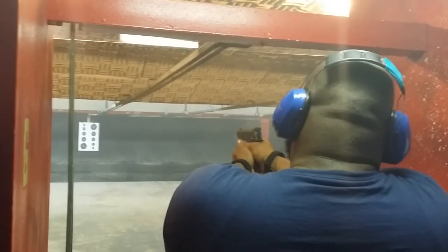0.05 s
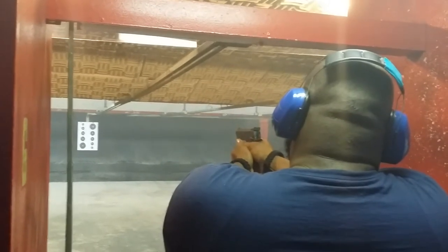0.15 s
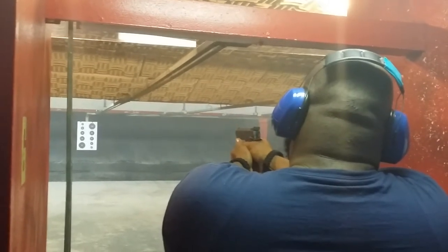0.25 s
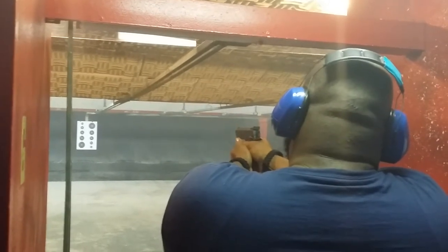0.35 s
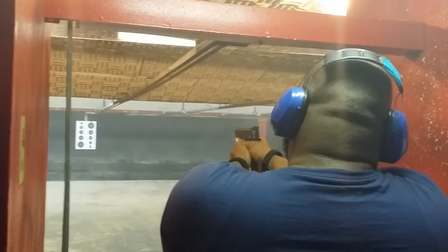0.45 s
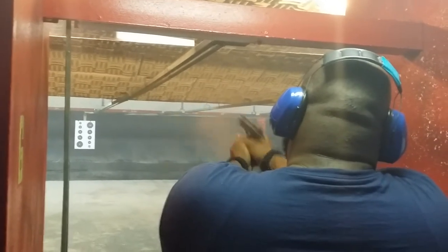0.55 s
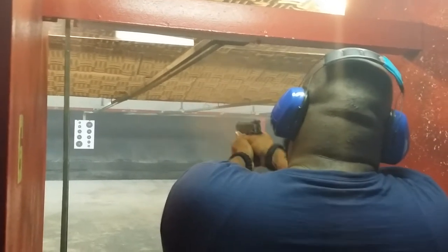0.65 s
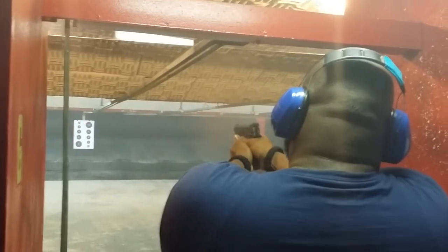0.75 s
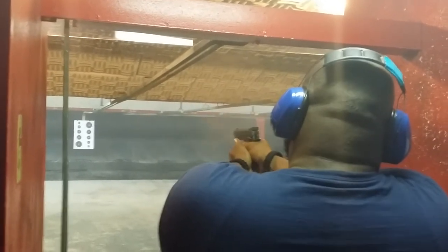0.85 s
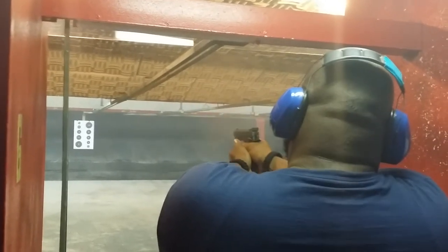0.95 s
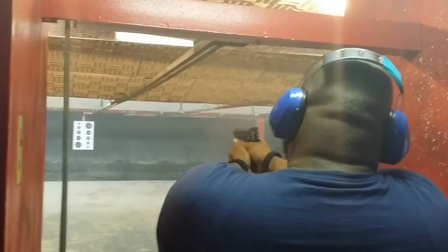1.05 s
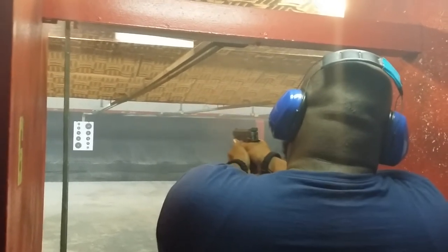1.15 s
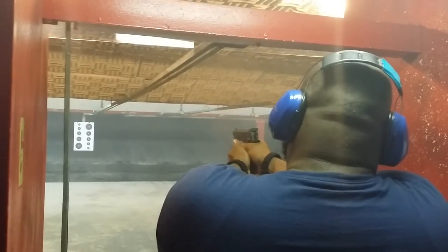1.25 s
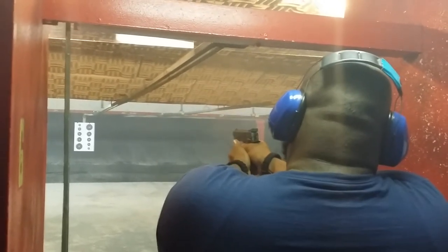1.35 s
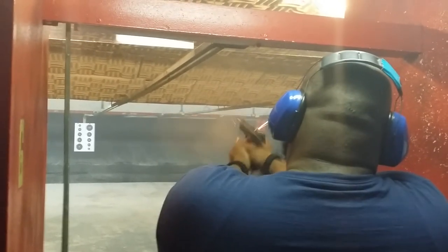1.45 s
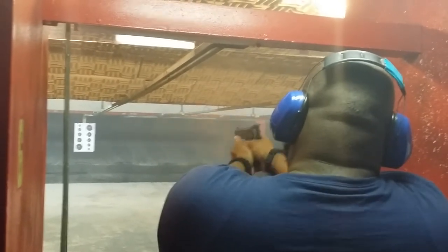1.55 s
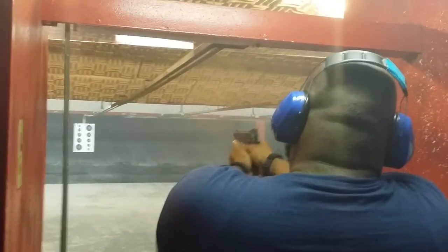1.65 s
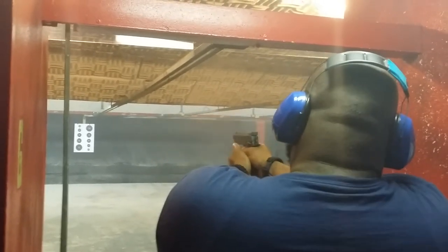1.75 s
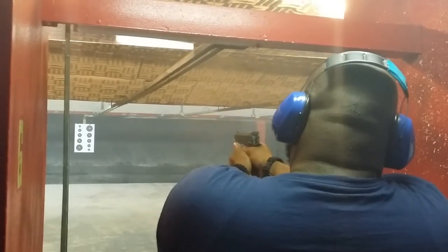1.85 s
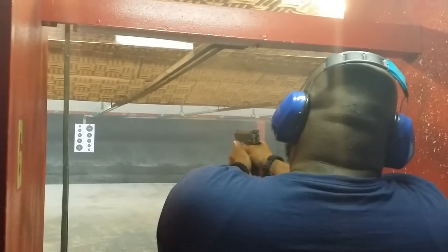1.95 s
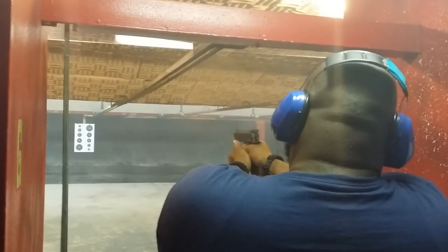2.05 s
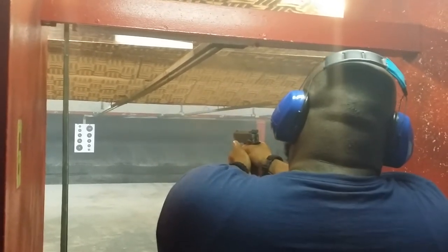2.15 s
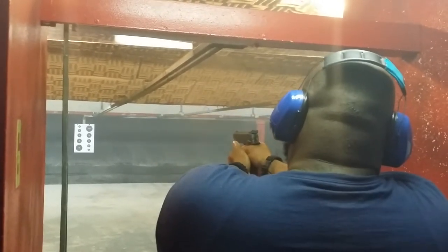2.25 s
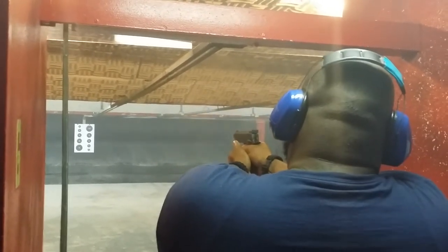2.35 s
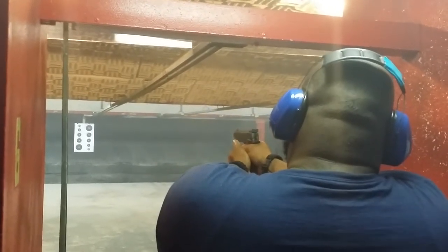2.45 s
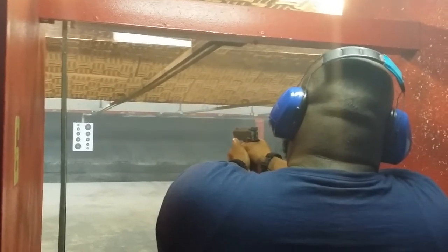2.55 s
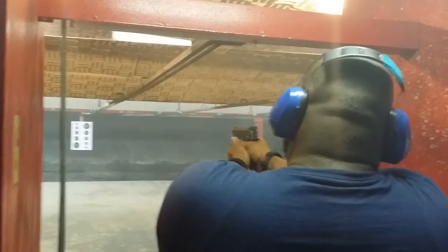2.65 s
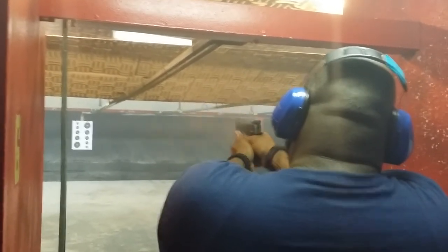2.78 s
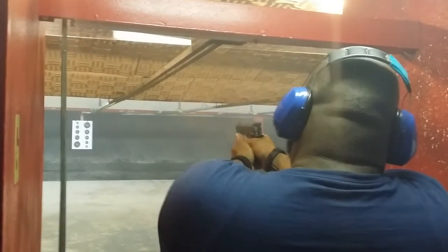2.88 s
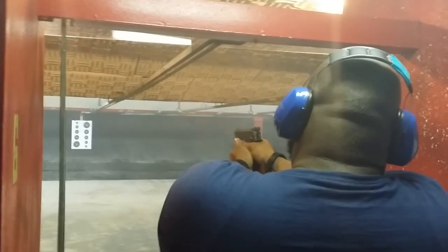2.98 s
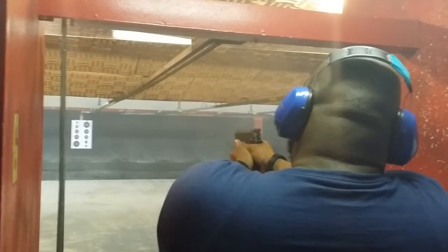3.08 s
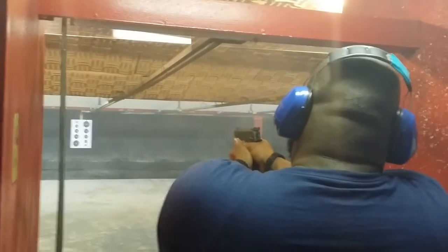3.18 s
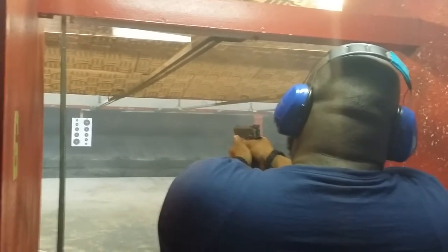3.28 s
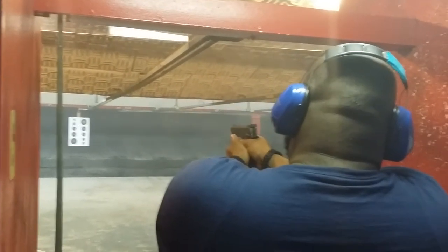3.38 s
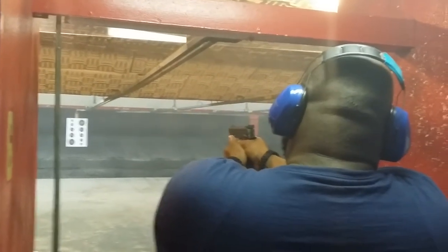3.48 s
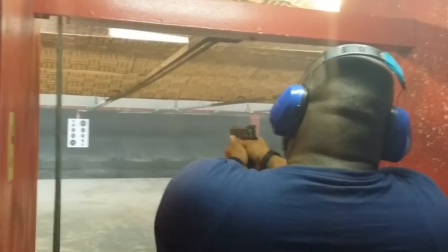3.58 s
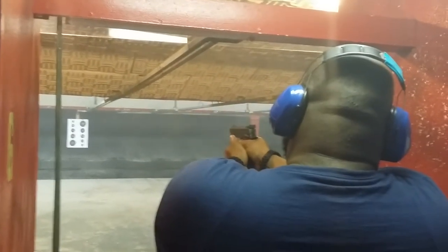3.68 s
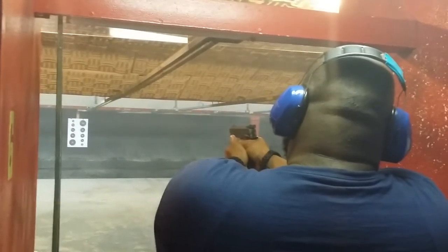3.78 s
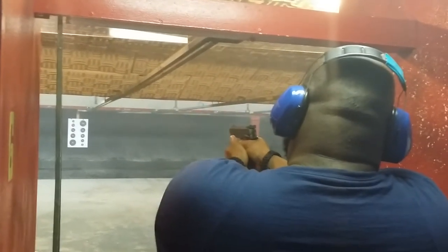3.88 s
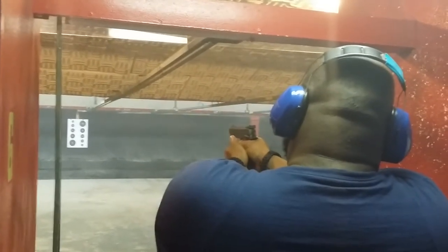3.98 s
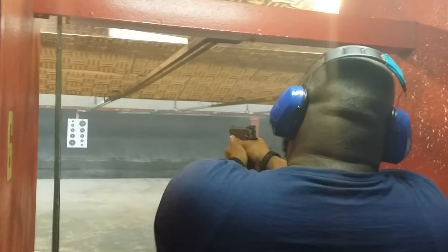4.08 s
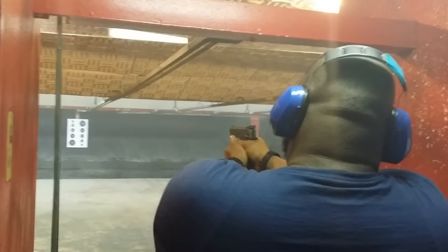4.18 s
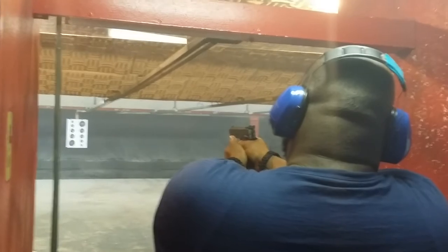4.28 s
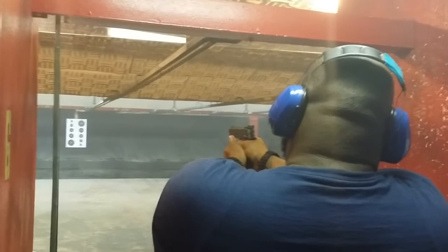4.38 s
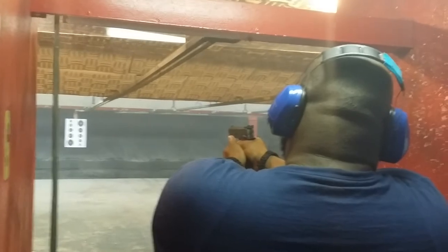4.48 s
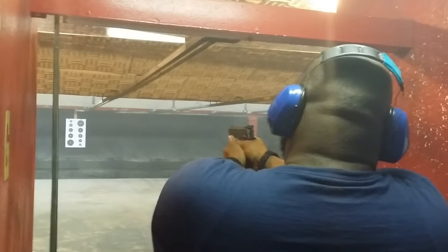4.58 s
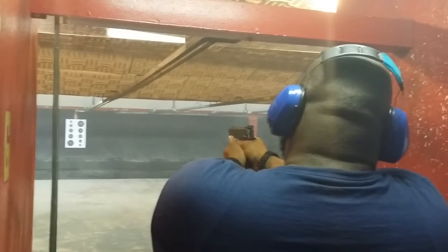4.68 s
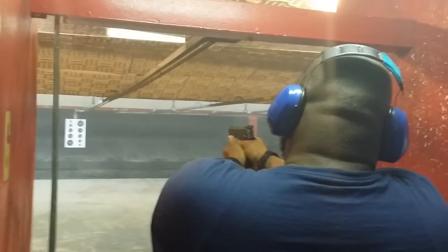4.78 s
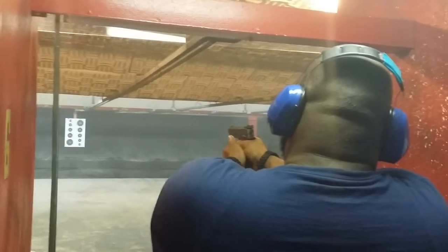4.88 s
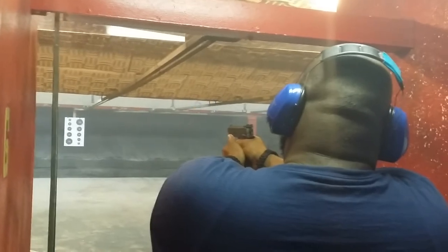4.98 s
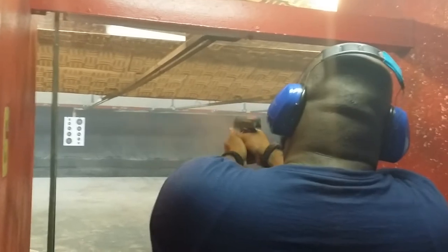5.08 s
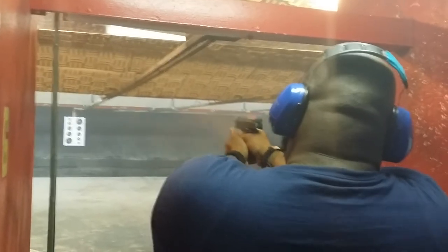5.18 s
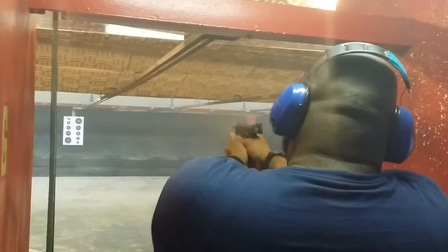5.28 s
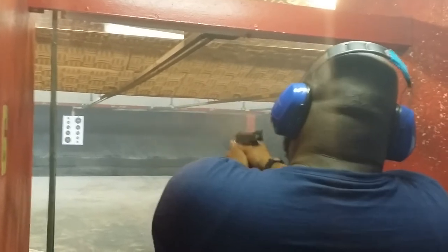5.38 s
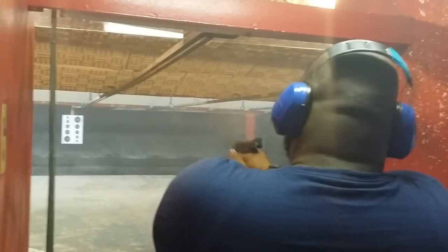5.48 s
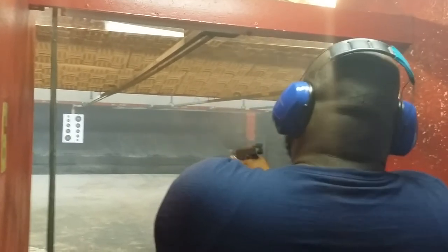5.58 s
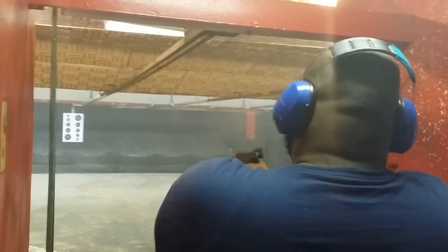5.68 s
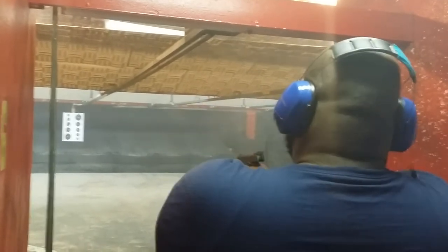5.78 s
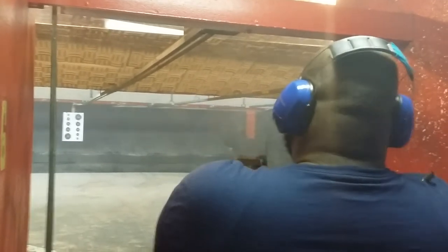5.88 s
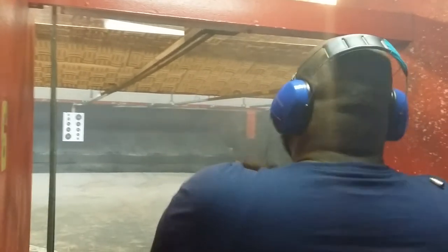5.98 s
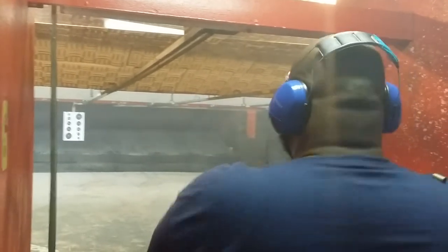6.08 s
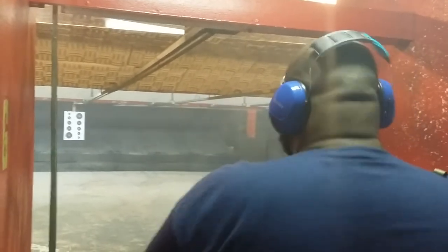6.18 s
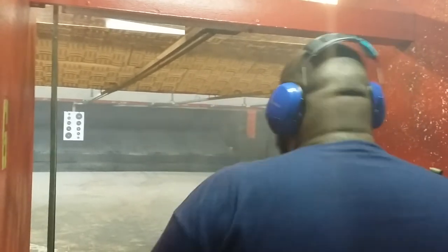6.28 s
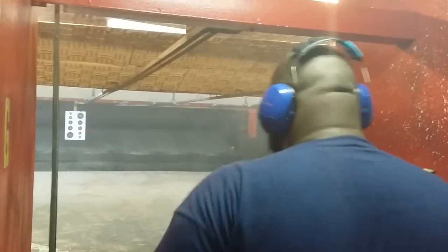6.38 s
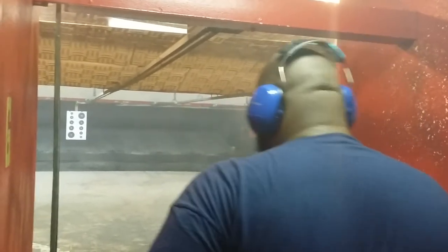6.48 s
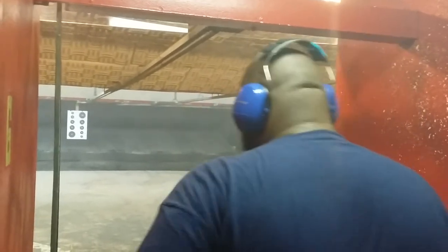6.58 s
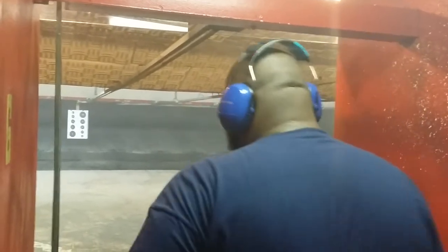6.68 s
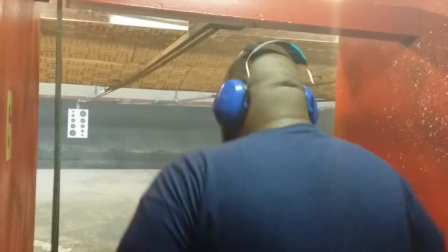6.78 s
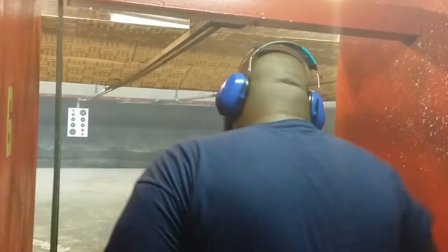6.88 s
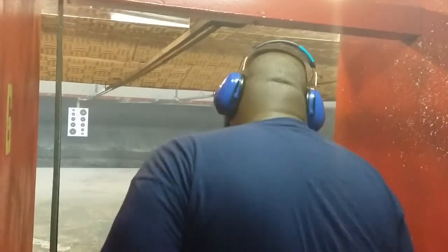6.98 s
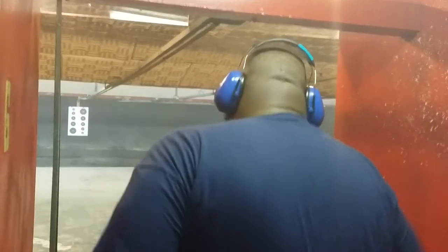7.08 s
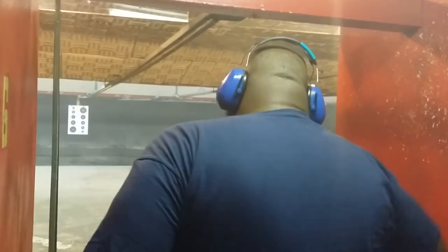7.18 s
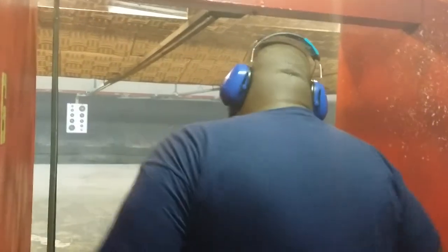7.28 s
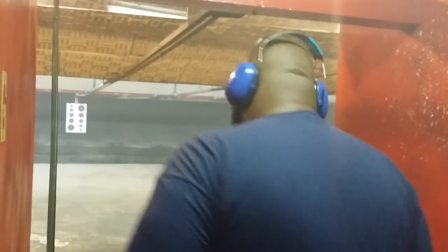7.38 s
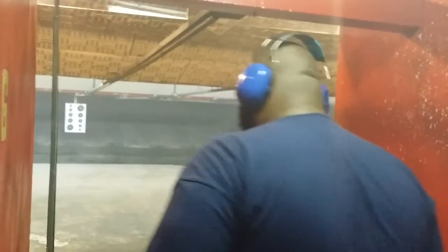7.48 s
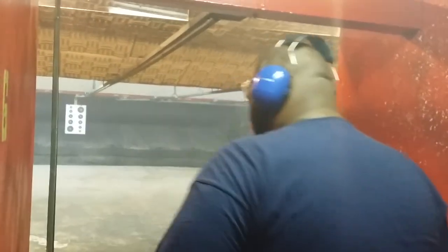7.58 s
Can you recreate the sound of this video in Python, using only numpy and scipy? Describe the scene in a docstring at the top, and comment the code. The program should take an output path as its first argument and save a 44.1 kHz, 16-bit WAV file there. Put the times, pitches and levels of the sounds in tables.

```python
"""An echo dies away over ventilation rumble while a brass case rings and bounces; then four pistol shots.
We stand in a stall of an indoor range, close behind two microphones' worth of overload: each crack is
shaped noise that fills the stall, and the long concrete lane booms back as slower, darker noise.
Spent cases are noise bursts on partitions, bench and floor, with paired sines for the ringing brass.
Late on, cloth rustles as filtered noise while the shooter lowers the gun."""
import sys
import numpy as np
from scipy import signal
from scipy.fft import rfft, irfft, next_fast_len
from scipy.io import wavfile
from scipy.ndimage import uniform_filter1d, map_coordinates

SR = 44100
rng = np.random.default_rng(int(sys.argv[2]) if len(sys.argv) > 2 else 0)


def unload_wav(signal):
    """Save mono or channel-first audio to the path in sys.argv[1] as 16-bit WAV at rate SR, clipped to [-1, 1]."""
    wavfile.write(
        sys.argv[1],
        SR,
        np.round(np.clip(np.atleast_2d(signal).T, -1, 1) * 32767).astype(np.int16),
    )


N = 336924

# In every spectrum below, density_db is the relative level per Hz.
# the shots: start_s, strength_db, pitch_hz of the case thrown out
SHOTS = [(0.471, -1, 7480), (1.384, -0.5, 7390), (2.6621, -0.5, 7490), (4.9713, -1, 7472)]
# cases striking a partition, plus one faint bright tick at 0.95 s: start_s, level_db of the blow, treble_db,
# ring_db of the case
PARTITION_HITS = [(0.9528, -36, 11, -62), (1.3408, -14.5, -9, -40.5), (1.9445, -24.5, 7, -63),
                  (2.197, -27.5, -2, -42.5), (3.2724, -32, -1.5, -66), (3.6127, -20.5, 1.5, -32.5),
                  (7.1146, -15, -7.5, -31.5), (7.2463, -29, 1, -64)]
# the rumble is nearly the same at both microphones in the deep bass: freq_hz, likeness (1 = identical)
RUMBLE_LIKENESS = [(60, 1), (240, 0.54), (950, -0.0013), (3770, -0.04), (15000, -0.07)]


def amp(db):
    """Decibels to gain."""
    return 10 ** (np.asarray(db) / 20)


def unit(x):
    """Scale to rms 1."""
    return x / np.sqrt(np.mean(x ** 2) + 1e-20)


def along(points, hz):
    """(Hz, value) points read on a log frequency axis."""
    f, v = np.transpose(points)
    return np.interp(np.log(hz + 1), np.log(f + 1), v)


def clock(count):
    """Seconds for count samples."""
    return np.arange(count) / SR


def wobble(rate):
    """A smooth random curve, rate knots a second."""
    knots = rng.standard_normal(int(N * rate / SR) + 4)
    return map_coordinates(knots, [clock(N) * rate])


def sides(right_db):
    """Left and right gains for a source that leans right by right_db."""
    return amp(np.array([[-right_db], [right_db]]) / 2)


def add(track, s, sound):
    """Mix a stereo sound in at time s, cut off at the end of the track."""
    part = track[:, round(s * SR):][:, :sound.shape[1]]
    part += sound[:, :part.shape[1]]


def noise(spectrum, count, lifts=(), alike=None):
    """Diffuse stereo noise of rms 1 with a spectrum, resonant lifts and a left-right likeness."""
    # usual likeness of the two microphones: freq_hz, likeness (1 = identical, -1 = opposed)
    usual_likeness = [(60, -0.66), (130, 0.81), (290, 0.2), (640, 0.73), (1200, -0.33), (3000, 0.13),
                      (10000, 0.05)]
    # the side wall favours the right microphone at most frequencies: freq_hz, right_minus_left_db
    wall_lean = [(100, 2.5), (300, -1), (600, 4), (1100, 3.5), (2200, 6), (4200, -1), (7500, 2),
                 (13000, 4.5)]
    hz = np.fft.rfftfreq(count, 1 / SR)
    db = along(spectrum, hz)
    for centre, width, lift in lifts:
        db = db + lift / (1 + (2 * (hz - centre) / width) ** 2)
    likeness = along(usual_likeness if alike is None else alike, hz)
    # the angle between mid and side sets how alike the channels are
    turn = np.arccos(np.clip(likeness, -1, 1)) / 2
    mid, side = rfft(rng.standard_normal((2, count))) * amp(db) * [np.cos(turn), np.sin(turn)]
    lean = amp(along(wall_lean, hz) / 2)
    return unit(irfft([(mid + side) / lean, (mid - side) * lean], count))


def dying(x, t60s, hold=0):
    """After hold seconds each frequency dies at its own speed."""
    hz, t, z = signal.stft(x, SR, nperseg=256)
    fall = amp(-60 * np.maximum(t - hold, 0) / along(t60s, hz)[:, None])
    return signal.istft(z * fall, SR, nperseg=256)[1][:, :x.shape[1]]


def ventilation(vent_db=-51):
    """Low air noise, slowly uneven in level, nearly alike at both microphones in the deep bass."""
    # ventilation rumble: freq_hz, density_db
    rumble = [(20, -25.5), (45, -11), (90, -4), (120, -1), (155, -10.5), (188, 1.5), (215, -8.5),
              (245, -0.5), (310, -17.5), (400, -24), (600, -29.5), (1000, -34.5), (2000, -45),
              (4000, -92.5)]
    return amp(vent_db + wobble(1.7)) * noise(rumble, N, alike=RUMBLE_LIKENESS)


def fan_tone(hz, db, flutter_db=2, drift_rad=.7):
    """A sine of rms level db that wavers in the room, its phase drifting apart at the two microphones."""
    level = amp(db + flutter_db * wobble(2.9))
    phase = drift_rad * np.array([wobble(4.8), wobble(2.3)])
    return level * np.sqrt(2) * np.sin(2 * np.pi * hz * clock(N) + phase)


def fan_hum(trim_db=-1):
    """Steady rotation gives a few fixed fan tones."""
    # fan tones: pitch_hz, level_db before the trim
    tones = [(118.4, -69), (188.4, -63), (242.2, -69.5), (915.2, -85.5)]
    return sum(fan_tone(hz, db + trim_db) for hz, db in tones)


def hiss(hiss_db=-65, dip_db=-11, dip_time=1.3, recovery=.1):
    """Steady noise that sinks at each shot and comes back about dip_time seconds later."""
    # the hiss: freq_hz, density_db
    hiss_colour = [(500, -25), (900, -7.5), (2000, -8.5), (3500, -4.5), (6700, -1.5), (9000, -6),
                   (14500, -11)]
    t = clock(N)
    dips = [(t > s) * (1 - np.tanh((t - s - dip_time) / recovery)) / 2 for s, *_ in SHOTS]
    return amp(hiss_db + dip_db * np.max(dips, axis=0)) * noise(hiss_colour, N)


def opening_echo(wash_db=-39, t60=1.1):
    """A wash of echo, already dying at the start, with two resonances."""
    # the wash: freq_hz, density_db
    wash_colour = [(200, -29.5), (400, -12), (950, -12.5), (1500, 0), (2300, -8.5), (3500, -13.5),
                   (6500, -16), (10000, -23), (14500, -35)]
    # its resonances: freq_hz, width_hz, lift_db
    wash_rings = [(1450, 90, 5), (2360, 180, 4)]
    return amp(wash_db - 60 * clock(N) / t60) * noise(wash_colour, N, wash_rings) * sides(1.5)


def background():
    """Everything that sounds in the stall without the shooter's help."""
    return ventilation() + fan_hum() + hiss() + opening_echo()


def clothes(lower_s=6.41, lower_db=-52, swell_db_per_s=37 + 26, ease_db_per_s=37, uneven_db=4.7, shift_db=3):
    """Cloth rubs unevenly as the shooter lowers the gun: it swells, peaks and eases, over a soft low rumble."""
    # one quick sleeve stroke: start_s (its middle), width_s, level_db
    sleeve_stroke = (6.361, 0.031, -41)
    # rubbing cloth: freq_hz, density_db
    cloth = [(240, -34), (400, -6), (804, -7.5), (1290, -2), (1740, -7), (2320, -7), (5860, -16.5),
             (13900, -36), (15000, -36)]
    # the shooter's weight shifting: freq_hz, density_db
    weight_shift = [(40, -23.5), (90, -1.5), (250, -4), (400, -20.5), (900, -60)]
    t = clock(N)
    effort_db = np.minimum(swell_db_per_s * (t - lower_s), ease_db_per_s * (lower_s - t))
    rub = amp(lower_db + effort_db + uneven_db * wobble(27))
    when, width, stroke_db = sleeve_stroke
    stroke = amp(stroke_db) * np.exp(-((t - when) / width) ** 4)
    rustle = (rub + stroke) * noise(cloth, N) * sides(0.787)
    rumble = amp(shift_db) * rub * noise(weight_shift, N, alike=RUMBLE_LIKENESS)
    return rustle + rumble


def bounces(count=5, shrink=.49, loss_db=7, glance_db=-8.5, topple_s=.09, topple_db=-13):
    """A falling case bounces ever sooner and softer, then topples: (s, level dB, ring dB) a landing."""
    # cases falling on the concrete floor: start_s, level_db of the first landing, first_flight_s,
    # rim_bounce (index of the landing on the rim), ring_db of that landing
    falls = [(0.1983, -24.5, .1975, 1, -33), (1.8872, -25.5, .21, 0, -39.5), (3.8117, -24, .252, 2, -38.5)]
    landings = []
    for s, db, flight, rim, ring_db in falls:
        for k in range(count):
            # each flight is shorter than the one before by the factor shrink
            when = s + flight * sum(shrink ** j for j in range(k))
            # a landing that misses the rim rings less
            miss_db = 0 if k == round(rim) else glance_db
            landings.append((when, db - loss_db * k, ring_db + miss_db))
        # at last the case tips over and rings once more
        landings.append((when + topple_s, db - loss_db * count, ring_db + topple_db))
    return landings


def case_pitch(s, earlier_case_hz=7410):
    """The case tumbling at time s came from the latest shot, or from one before the start."""
    return ([earlier_case_hz] + [hz for fired, _, hz in SHOTS if fired < s])[-1]


def brass(earlier_ring_db=-34, split_hz=24, scatter_hz=25, scatter=1.0):
    """A case mouth rings in close pairs of modes at each contact; tumbling and echoes make it waver."""
    # modes of a case mouth: pitch_ratio, level_db, t60_s
    mouth_modes = [(1, -3.5, 0.5), (1.597, -19, 0.27)]
    out, t = np.zeros((2, N)), clock(SR // 2)
    # a case from an earlier shot is ringing at the start
    for s, *_, db in [(0, earlier_ring_db)] + PARTITION_HITS + bounces():
        for ratio, level, t60 in mouth_modes:
            hz = case_pitch(s) * ratio
            phase = rng.uniform(0, 2 * np.pi, (2, 2, 1))
            pair = np.sin(2 * np.pi * hz * t + phase[0])
            pair = pair + 0.31 * np.sin(2 * np.pi * (hz + split_hz) * t + phase[1])
            # noise in a narrow band around the mode makes the ring waver
            band = 1 / (1 + ((np.fft.rfftfreq(len(t), 1 / SR) - hz) / scatter_hz) ** 2)
            waver = unit(irfft(rfft(rng.standard_normal((2, len(t)))) * band, len(t)))
            envelope = amp(db + level - 60 * t / t60) * (1 - np.exp(-t / 0.0011))
            add(out, s, envelope * (pair + scatter * waver))
    return out * sides(1.4)


def contact(spectrum, t60, room_db, room_t60, lifts=(), rise=.0005):
    """A short burst from the struck surface, followed by its echo in the stall."""
    t = clock(SR // 2)
    direct = noise(spectrum, len(t), lifts) * amp(-60 * t / t60)
    # the stall swallows treble sooner
    room_t60s = [(1000, room_t60), (7000, 0.67 * room_t60), (14000, .5 * room_t60)]
    echo = dying(noise(spectrum, len(t), lifts), room_t60s)
    echo = amp(room_db) * echo * (1 - np.exp(-t / 0.0051))
    return (direct + echo) * (1 - np.exp(-t / rise))


def tilted(spectrum, body_db, treble_db):
    """A blow's spectrum with more or less body and treble."""
    tilt = [(600, body_db), (1500, 0), (3000, 0), (6000, treble_db)]
    return [(hz, db + along(tilt, hz)) for hz, db in spectrum]


def floor_ticks(snap_db=-2, hollow_db=-5):
    """Brass on concrete snaps very briefly; the air in the empty case rings on in the stall."""
    # a case on the floor: freq_hz, density_db
    tick = [(300, -30), (1500, -17), (3000, -8.5), (4300, -3.5), (5500, -5.5), (7000, -3.5), (10000, -21.5),
            (14500, -23.5)]
    # the air inside an empty case: freq_hz, width_hz, lift_db
    case_air = (4300, 480, 12)
    out = np.zeros((2, N))
    for s, db, _ in bounces():
        snap = amp(snap_db) * noise(tick, SR // 2) * amp(-60 * clock(SR // 2) / 0.013)
        hollow = contact(tick, t60=0.057, room_db=-10, room_t60=.55, lifts=[case_air], rise=0.000323)
        add(out, s, amp(db) * sides(.8) * (snap + amp(hollow_db) * hollow))
    return out


def bench_knocks(lift_db=7, treble_db=-5.5):
    """Hollow knocks: blows make the bench sound at its resonances, duller than a partition."""
    # knocks on the bench: start_s, level_db, body_db, t60_s
    knocks = [(2.043, -6.5, -1, 0.1), (2.068, -13.5, 3.5, 0.21), (2.51, -12, 1, 0.13),
              (2.61, -27, -2, 0.12), (4.383, -50, -10, 0.086), (4.406, -41.5, -6.5, 0.084),
              (6.701, -46, -4, 0.11), (6.977, -27, -2.5, 0.11)]
    # a blow on the bench: freq_hz, density_db
    knock_colour = [(100, -31.5), (250, -21.5), (400, 1.5), (520, -1.5), (720, -2), (1000, -5.5),
                    (1400, -8.5), (2000, -14), (4000, -14.5), (7000, -17), (10000, -25), (14500, -36.5)]
    # resonances of the bench: freq_hz, width_hz
    bench_modes = [(494, 11), (710, 80), (894, 57), (1230, 60), (1400, 130), (1895, 42), (2080, 140),
                   (2700, 53), (3400, 40)]
    out = np.zeros((2, N))
    board = [(hz, width, lift_db) for hz, width in bench_modes]
    for s, db, body_db, t60 in knocks:
        colour = tilted(knock_colour, body_db, treble_db)
        knock = contact(colour, t60, room_db=-12.5, room_t60=0.47, lifts=board)
        add(out, s, amp(db) * sides(.8) * knock)
    return out


def partition_clacks(lift_db=8, firm_db=-21.5, body_per_db=0.78, right_db=3.5):
    """Cases clack on the partition to the right; a blow softer than firm gains body, a harder one loses it."""
    # a blow on a partition: freq_hz, density_db
    clack_colour = [(100, -20.5), (300, -11), (500, -5.5), (1000, -6.5), (1600, -4.5), (2700, -8.5),
                    (4000, -8.5), (6000, -19.5), (9000, -29), (14500, -36)]
    # resonances of a partition: freq_hz, width_hz
    partition_modes = [(237, 27), (1000, 61), (1450, 63), (1850, 80), (2400, 34), (2600, 93), (2900, 110),
                       (3540, 27)]
    out = np.zeros((2, N))
    wall = [(hz, width, lift_db) for hz, width in partition_modes]
    for s, db, treble_db, _ in PARTITION_HITS:
        colour = tilted(clack_colour, body_per_db * (firm_db - db), treble_db)
        clack = contact(colour, t60=.11, room_db=-16.0, room_t60=.5, lifts=wall, rise=0.0003)
        add(out, s, amp(db) * sides(right_db) * clack)
    return out


def stall_crack(count):
    """The bright blast starts almost at once, holds for an instant and dies between the stall walls."""
    # the blast: freq_hz, density_db
    crack_colour = [(25, -34), (80, -9.5), (200, -7), (500, -4.5), (1000, -1.5), (2000, 0), (3600, -4.5),
                    (5500, -4), (9000, -10), (14500, -13)]
    # how long the stall rings: freq_hz, t60_s
    stall_decay = [(100, .5), (1000, 1), (5000, 0.34), (9000, 0.49), (13000, 0.33)]
    crack = dying(noise(crack_colour, count), stall_decay, hold=.03)
    return crack * (1 - np.exp(-clock(count) / 0.00016))


def lane_answer(count, boom_db=-2, arrival=.08, swell=0.0077, early_db=-13, linger_db=-42, linger_t60=2.3,
                return_db=-4, return_time=.105, return_width=.028):
    """The lane's darker boom swells up once sound has been down range and back, then lingers."""
    # the boom of the lane: freq_hz, density_db
    boom_colour = [(25, -40), (50, -16.5), (75, -4.5), (130, -4), (220, 0), (400, -4), (800, 1.5),
                   (1300, -2.5), (2700, -4.5), (3600, -10), (6000, -12.5), (9000, -19), (11000, -35),
                   (14500, -62)]
    # how long the lane rings: freq_hz, t60_s
    lane_decay = [(60, 0.69), (170, 1.137), (250, 1.4), (400, 0.64), (1000, 0.46), (2500, 0.6),
                  (5000, 0.56), (8000, 0.53), (12000, 0.15)]
    # standing waves of the lane: freq_hz, width_hz, lift_db
    standing_waves = [(186, 12, 5), (220, 12, 3), (283, 14, 3), (340, 14, 4), (424, 16, 3), (596, 30, 3),
                      (660, 30, 3), (792, 16, 6), (930, 36, 3), (1227, 20, 5), (1514, 20, 4), (2358, 30, 4)]
    # later returns from the far end: delay_s, width_s, lift_db
    late_returns = [(0.284, 0.029, 3), (.34, 0.03, 3.5), (0.459, 0.014, 3)]
    # the first strong return, from the backstop: freq_hz, density_db
    backstop = [(40, -25), (80, 0), (140, -8.5), (300, -9), (500, -6), (850, -1), (1150, -6), (1600, -7.5),
                (4000, -29), (12000, -54.5)]
    # faint sound lingering in the far end: freq_hz, density_db
    far_end = [(60, -15.5), (200, 0.5), (500, 1.5), (1200, -10), (2500, -16.5), (4000, -27.5), (9000, -64)]
    # something steel in the lane sings on: freq_hz, width_hz, lift_db
    steel_ring = (2335, 45, 19)
    t = clock(count)
    boom = dying(noise(boom_colour, count, standing_waves), lane_decay, hold=0.12)
    lifts_db = [db * np.exp(-((t - delay) / width) ** 2) for delay, width, db in late_returns]
    echoes = amp(boom_db) * boom * amp(sum(lifts_db)) * sides(0.87)
    linger = amp(linger_db - 60 * t / linger_t60) * noise(far_end, count, standing_waves + [steel_ring])
    # held down by early_db until the arrival time
    build = amp(early_db / (1 + np.exp(np.minimum((t - arrival) / swell, 50))))
    build = build * (1 - np.exp(-t / 0.0046))
    bloom = amp(return_db) * np.exp(-((t - return_time) / return_width) ** 2)
    return build * (echoes + linger) + bloom * noise(backstop, count, standing_waves)


def report(crack_db=-2):
    """One shot: the crack in the stall, a little to the left, and the answer of the lane."""
    count = 2 * SR
    return amp(crack_db) * stall_crack(count) * sides(-4.4) + lane_answer(count)


def pistol(fresh=.45):
    """The gun stays in place, so every shot wakes nearly the same echoes."""
    out, same = np.zeros((2, N)), report()
    for s, db, _ in SHOTS:
        add(out, s, amp(db) * (same + fresh * report()) / np.hypot(1, fresh))
    return out


def scene():
    """Everything that reaches the two microphones."""
    cases = brass() + floor_ticks() + bench_knocks() + partition_clacks()
    return background() + clothes() + cases + pistol()


def record(dry, ceiling_db=0., top=0.97, hardness=7, makeup_db=-1.21, spit_above=0.38, spit_db=-10,
           low_hz=50, order=4, top_hz=15000):
    """Each microphone has a fast limiter, clips what is left, spits hiss in overload and loses deep bass."""
    # the hiss of an overloaded microphone: freq_hz, density_db
    spit_colour = [(5000, -42.5), (9000, -7), (11000, 4.5), (14500, 0.5)]
    power = np.abs(uniform_filter1d(dry ** 2, size=400, axis=1))
    held = dry / (1 + (power / amp(ceiling_db) ** 2) ** 2) ** (1 / 4)
    clipped = amp(makeup_db) * held / (1 + np.abs(held / top) ** hardness) ** (1 / hardness)
    drive = np.sqrt(np.abs(uniform_filter1d(clipped ** 2, size=800, axis=1)))
    spit = amp(spit_db) * np.maximum(drive - spit_above, 0) * noise(spit_colour, N)
    high_pass = signal.butter(order, low_hz, "high", fs=SR, output="sos")
    thinned = signal.sosfilt(high_pass, clipped + spit)
    # the treble fades out over the last 400 Hz below top_hz
    size = next_fast_len(N + SR)
    edge = np.clip((top_hz - np.fft.rfftfreq(size, 1 / SR)) / 400, 0, 1)
    return irfft(rfft(thinned, size) * edge, size)[:, :N]


dry = scene()
out = record(dry)
unload_wav(out)
```